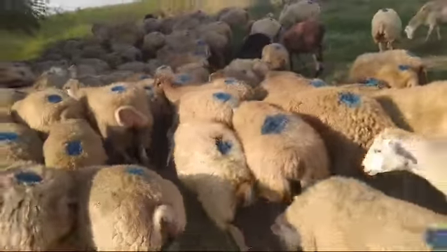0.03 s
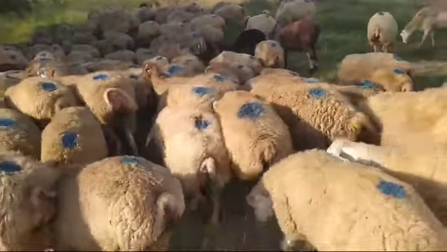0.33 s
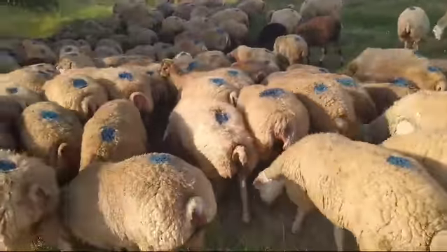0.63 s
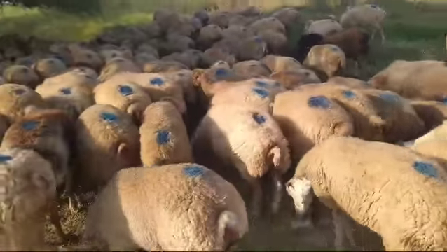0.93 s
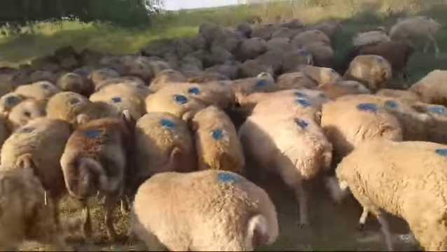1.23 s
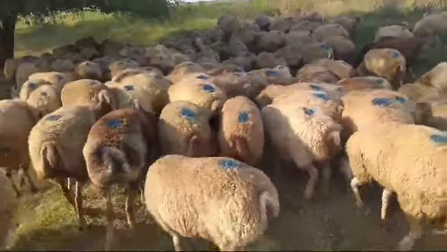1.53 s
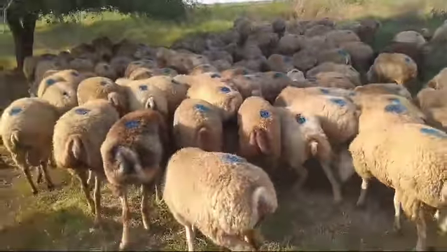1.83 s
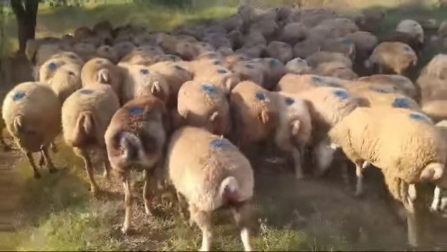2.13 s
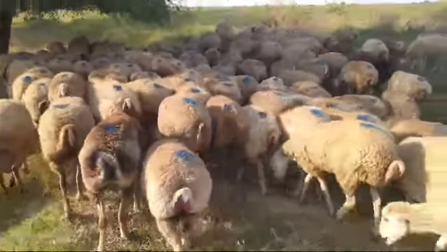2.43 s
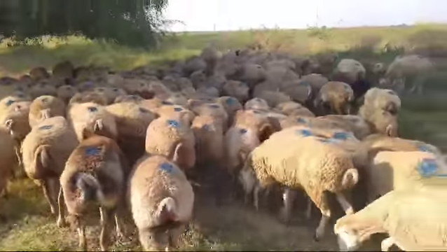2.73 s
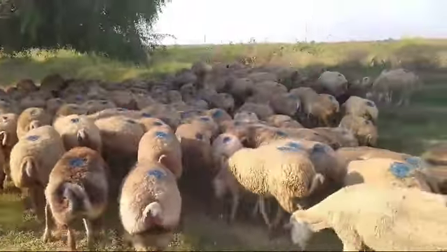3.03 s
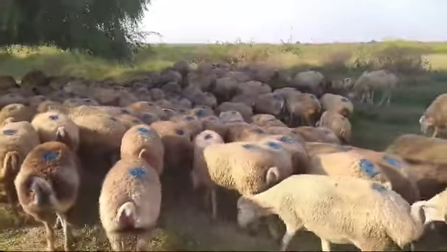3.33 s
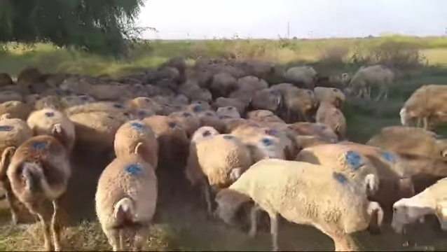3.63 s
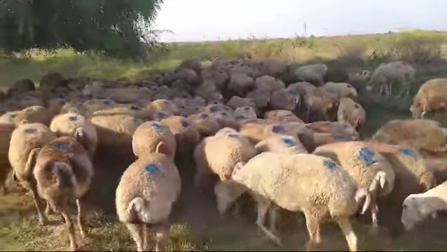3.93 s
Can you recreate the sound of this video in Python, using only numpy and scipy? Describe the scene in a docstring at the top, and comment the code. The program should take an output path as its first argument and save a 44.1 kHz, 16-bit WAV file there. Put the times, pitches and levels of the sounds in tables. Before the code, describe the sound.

Sheep rustle and crackle through grass while handling knocks and soft footsteps hit the microphone.

```python
"""Grass rustles close by as a flock of sheep crosses a field, followed on foot with a hand-held phone.
Legs and muzzles brush and snap the stalks, mostly on the left; hooves patter and the walker's steps
thud softly. Sharp knocks, probably fingers on the case, ring one microphone port at a time.
Near the end a far bird chatters. Behind it all lie the distant flock and a light rumble of wind."""
import sys
import numpy as np
from scipy import signal
from scipy.fft import rfft, irfft
from scipy.io import wavfile
from scipy.ndimage import uniform_filter1d

SR = 44100
rng = np.random.default_rng(int(sys.argv[2]) if len(sys.argv) > 2 else 0)


def waveform_to_disk(signal):
    """Save audio, clipped to [-1, 1], as 16-bit WAV at the path in sys.argv[1]."""
    frames = np.transpose(np.atleast_2d(signal))
    scaled = np.clip(frames, -1, 1) * 32767
    samples = np.round(scaled).astype(np.int16)
    wavfile.write(sys.argv[1], SR, samples)


N = 4 * SR
T = np.arange(N) / SR
HZ = np.maximum(np.fft.rfftfreq(N, 1 / SR), 1e-3)


def undb(db):
    """Decibels to gain."""
    return 10 ** (np.asarray(db) / 20)


def unit(x):
    """Scale to rms 1."""
    return x / np.sqrt(np.mean(x ** 2))


def pan(db):
    """Left and right gains for a level difference; positive is left."""
    return unit(undb(np.array([[db], [-db]]) / 2))


def noise():
    """Independent white noise at the two microphones."""
    return rng.standard_normal((2, N))


def resonance(hz, width_hz):
    """Frequency response of one resonance."""
    return 1 / (1 + 1j * (HZ ** 2 - hz ** 2) / (HZ * width_hz))


def band(x, hz, width_hz):
    """Pass through a resonance twice; rms 1."""
    return unit(irfft(rfft(x) * resonance(hz, width_hz) ** 2, N))


def smooth(x, width_hz):
    """Low-pass to rms 1; multiplied by a tone, this makes a band width_hz wide."""
    return unit(irfft(rfft(x) / (1 + (2 * HZ / width_hz) ** 2), N))


def colour(x, points):
    """Shape the spectrum by (f/Hz, gain/dB) points; rms 1."""
    hz, db = np.array(points).T
    return unit(irfft(rfft(x) * undb(np.interp(np.log(HZ), np.log(hz), db)), N))


def wander(rate_hz):
    """Smooth random drift; rms 1."""
    hold = int(SR / rate_hz)
    stairs = np.repeat(rng.standard_normal(N // hold + 1), hold)
    return unit(uniform_filter1d(uniform_filter1d(stairs, hold), hold)[:N])


def grains(per_s, spread_db):
    """Random stereo impulses, mostly small and a few large."""
    size = undb(spread_db * np.minimum(rng.exponential(size=(2, N)), 5))
    return (rng.random((2, N)) < per_s / SR) * size * np.sign(noise())


def swell(at, rise_s, fall_s):
    """A rounded rise and fall about one moment."""
    return np.exp(-((T - at) / np.where(T < at, rise_s, fall_s)) ** 2)


# Rustle of the grass close by: t/s, left level/dB, right level/dB
RUSTLE_LEVELS = [(0, -41.5, -52), (.27, -45, -51.5), (.42, -43.5, -60), (.52, -45, -53), (.72, -43.5, -52),
                 (.95, -44, -51), (1.15, -42.5, -49), (1.38, -41.5, -44.5), (1.44, -45.5, -51.5),
                 (1.8, -41.5, -45.5), (1.845, -45.5, -47.5), (1.93, -44, -48), (2.32, -43.5, -47),
                 (2.41, -49.5, -51), (2.51, -44.5, -50), (2.68, -46.5, -53), (3.15, -45.5, -52),
                 (3.42, -45, -51), (3.56, -42.5, -50.5), (3.68, -47.5, -50.5), (4, -47.5, -47.5)]
# Its spectrum at the left and at the right microphone: f/Hz, relative level/dB
RUSTLE_LEFT = [(1500, -15.5), (3000, -8), (5000, -10.5), (6500, -6.5), (8200, -1), (11500, -2), (13500, -8),
               (16000, -22)]
RUSTLE_RIGHT = [(1500, -5), (3000, -4.5), (5000, -1), (7500, -1), (11000, -14.5), (16000, -3)]
# Narrow swish within it, a little to the right: t/s, centre f/Hz, level/dB
SWISH_PATH = [(0, 9700, -43.5), (0.449, 9430, -50.5), (0.583, 9210, -48), (0.799, 8950, -49.5),
              (1.253, 8370, -47.5), (1.479, 8380, -47.5), (1.652, 7900, -49.5), (1.78, 7460, -41.5),
              (1.845, 7420, -58), (1.923, 7590, -47.5), (2.151, 7120, -61), (2.27, 8300, -48),
              (2.4, 8240, -107)]

def grass(blades_per_s=2800):
    """Countless blades brush past legs and wool; a narrow swish sinks in pitch and fades."""
    times, left_db, right_db = np.array(RUSTLE_LEVELS).T
    left, right = grains(blades_per_s, spread_db=1.5)
    blades = np.array([colour(left, RUSTLE_LEFT) * undb(np.interp(T, times, left_db)),
                       colour(right, RUSTLE_RIGHT) * undb(np.interp(T, times, right_db))])
    times, hz, db = np.array(SWISH_PATH).T
    phase = 2 * np.pi * np.cumsum(np.interp(T, times, hz)) / SR
    brushing = smooth(grains(blades_per_s, spread_db=1.5), width_hz=3100)
    swish = unit(brushing * np.cos(phase)) * undb(np.interp(T, times, db))
    flicker_db = 1.94 * wander(rate_hz=45.38)
    return (blades + swish * pan(db=-4)) * undb(flicker_db)


# Tufts crushed underfoot, left of centre: t/s, rise and fall/s, level/dB, centre f/Hz, L-R/dB
TRODDEN_TUFTS = [(.41, 0.093, -43.5, 7900, 3), (0.605, 0.059, -46, 5540, 13), (1.13, 0.068, -45, 7100, 3),
                 (1.797, 0.016, -37.5, 6400, 5), (2.26, 0.041, -48, 8070, 13), (3.3, 0.031, -53, 4560, 3),
                 (3.52, 0.21, -53, 3270, 5), (3.877, 0.0059, -41.5, 4640, 1)]

def tufts():
    """A trodden tuft gives way in a short shower of tiny cracks."""
    cracks = grains(per_s=1500, spread_db=1)
    return sum(band(cracks, hz, width_hz=3200) * undb(db) * swell(at, fade_s, fade_s) * pan(pan_db)
               for at, fade_s, db, hz, pan_db in TRODDEN_TUFTS)


def crinkle(rustle, spacing_hz=700, depth_db=1.8):
    """Narrow bands of the rustle flicker, each on its own."""
    spectrum = rfft(rustle)
    bands = (irfft(spectrum * np.maximum(0, 1 - abs(HZ - hz) / spacing_hz), N)
             for hz in range(0, 17000, spacing_hz))
    trim = undb(-depth_db ** 2 * np.log(10) / 20)  # offsets the power that the flicker adds
    return trim * sum(part * undb(depth_db * wander(rate_hz=39.7)) for part in bands)


# Stalks snapping nearby, mostly on the left: t/s, crack level over 10 ms/dB, centre f/Hz, L-R/dB
STALK_SNAPS = [(0.3449, -36.5, 9100, 20), (0.695, -37, 9400, 2), (0.79, -50, 2600, 12),
               (0.839, -44, 9050, 9), (0.8915, -36.5, 9500, 5), (1.011, -44, 7900, 2),
               (1.129, -41, 8630, 2), (1.3355, -23.5, 9900, 7.5), (1.4628, -43, 9900, 10),
               (1.541, -43, 8900, 7), (1.635, -41.5, 8850, 17), (1.789, -36.5, 9700, 20),
               (1.8557, -36, 12100, 20), (1.9864, -45.5, 7300, 6), (2.0098, -47, 7900, -1),
               (2.019, -39.5, 7640, 8), (2.113, -37, 7400, 1.5), (2.2264, -47, 7500, 13),
               (2.262, -44, 8000, 15), (2.292, -47, 9000, 12), (2.342, -42, 10600, 15),
               (3.162, -48, 10700, 17), (3.1755, -45, 9500, 18), (3.2862, -42.5, 8700, 17),
               (3.7719, -46, 12300, 17), (3.876, -39.5, 8350, 11)]
# Woody body of a snap: f/Hz, relative level/dB
STALK_SPECTRUM = [(60, -20), (200, 5), (500, 7), (1100, 3), (2200, 0), (4500, 1), (9000, -14), (16000, -23)]

def snaps(rise_s=.0003, crack_s=.0005, splinter_s=.0028):
    """A stalk breaks with one sharp crack over a woody body and splinters for a few milliseconds."""
    out = np.zeros((2, N))
    body = undb(-16.5) * colour(signal.unit_impulse(N), STALK_SPECTRUM)
    for at, db, hz, pan_db in STALK_SNAPS:
        age = np.clip(T - at, 0, .1)
        attack = np.exp(np.clip(T - at, -.02, 0) / rise_s)
        decay = np.exp(-age / crack_s) + undb(-13) * np.exp(-age / splinter_s)
        burst = band(noise() * attack * decay, hz, width_hz=.46 * hz)
        crack = np.array([unit(side) for side in burst])
        out += (crack + np.roll(body, int(at * SR))) * undb(db) * pan(pan_db)
    return out * np.sqrt(.01 * SR / N)  # levels hold over 10 ms


def hooves():
    """Many small hooves patter on the soil and, to the left, crackle in dry stems."""
    soil, stems = grains(per_s=45, spread_db=3), grains(per_s=100, spread_db=3)
    patter = band(soil + .5 * soil[::-1], hz=386, width_hz=710)  # each hoof reaches both microphones
    crumble = rng.standard_normal((1, SR // 20)) * np.exp(-T[:SR // 20] / .005)
    ticks = signal.fftconvolve(stems + .1 * stems[::-1], crumble)[:, :N]
    crackle = band(ticks, hz=6440, width_hz=10500)
    return undb(-65) * patter + undb(-56) * crackle * pan(db=16.5)


# Knocks right at the microphones: t/s, port (0 left, 1 right),
# levels over 10 ms of deep push/dB, thud/dB, knock/dB and crack/dB, crack f/Hz
PORT_KNOCKS = [(0.688, 1, -44, -38, -39.5, -33.5, 2150), (0.8818, 0, -53, -47, -44, -39, 2780),
               (0.893, 0, -63, -23.5, -22.5, -20.5, 2240), (1.463, 0, -62, -35.5, -33.5, -36, 2550),
               (1.6374, 0, -53, -36, -30.5, -36, 2530), (1.657, 0, -48, -33.5, -74, -54, 2340),
               (1.7889, 0, -61, -37.5, -34, -45.5, 2805), (1.9864, 0, -64, -38.5, -38, -47, 3287),
               (2.0121, 1, -41, -70, -29, -35, 1532), (2.0096, 0, -52, -56, -42, -51, 2400),
               (2.0203, 0, -41, -53, -41.5, -36.5, 2300), (2.499, 1, -44, -71, -45, -48, 1790),
               (2.6156, 1, -49, -32.5, -36, -65, 1630), (2.7413, 1, -38.5, -38.5, -50, -52.5, 2130),
               (2.768, 1, -45, -58, -44, -43, 1700), (2.7917, 1, -30, -19.5, -30.5, -33.5, 2240),
               (2.9533, 1, -55, -43, -45, -52, 2050), (2.9917, 1, -32, -20, -26, -32, 2310),
               (3.0442, 1, -42.5, -70, -43, -42, 3100), (3.0521, 1, -59, -70, -48, -43, 1700),
               (3.107, 1, -46, -63, -42, -34.5, 3370), (3.224, 1, -44, -67, -49.5, -43.5, 2140),
               (3.2588, 1, -49, -44, -46.5, -41, 1760)]
# Push, thud and knock resonances of a port: f/Hz, width/Hz
PORT_RESONANCES = [(65, 600), (235, 327), (560, 716)]
# Bands that the phone's tone filters delay, so each knock ends in a short low ring: f/Hz, width/Hz
PHONE_FILTER_BANDS = [(144, 33), (810, 150)]

def knocks(body_top_hz=3500, edge_db=(-21, -11.5)):
    """Each knock rings one port: the crack and its bright edge lead, the lows follow and ring briefly."""
    filter_delay = np.prod([1 - 2 * resonance(hz, width) for hz, width in PHONE_FILTER_BANDS], axis=0)
    length = SR // 10

    def ring(hz, width_hz, top_hz=None):
        response = resonance(hz, width_hz) ** 2 * filter_delay
        if top_hz:
            response *= signal.freqs(*signal.butter(6, 1, analog=True), HZ / top_hz)[1]
        return unit(irfft(response, N)[:length]) / np.sqrt(10)  # energy of 10 ms at rms 1

    push, thud, knock = (ring(hz, width, body_top_hz) for hz, width in PORT_RESONANCES)
    edge = ring(hz=6250, width_hz=2600)
    out = np.zeros((2, N + length))
    for at, port, push_db, thud_db, knock_db, crack_db, hz in PORT_KNOCKS:
        start = int(at * SR)
        body = undb(thud_db) * thud - undb(push_db) * push - undb(knock_db) * knock
        # a harder, higher crack is also wider and reaches further into the treble
        crack = ring(hz, width_hz=.64 * hz, top_hz=1.48 * hz) - undb(edge_db[port]) * edge
        out[port, start:start + length] += body + undb(crack_db) * crack
    return out[:, :N]


# The walker's steps, below the phone: peak t/s, thud level/dB, scuff level/dB
FOOTFALLS = [(.005, -51.5, -83), (0.567, -41.5, -47.5), (1.065, -47, -59), (1.562, -41, -60),
             (2.04, -64, -58), (2.529, -43, -55), (3.025, -49, -59), (3.454, -46.5, -56.5),
             (3.926, -50, -78)]
# Sole on the ground: f/Hz, relative level/dB
SCUFF_SPECTRUM = [(100, 1), (280, 6), (620, 6), (1200, -2), (2200, -9.5), (6000, -5), (14000, -55)]

def steps(scuff_lag_s=.032):
    """Soft footfalls boom through the hand; the sole scuffs the ground just after."""
    boom = band(rng.standard_normal(N), hz=186.3, width_hz=94)
    boom /= np.sqrt(uniform_filter1d(boom ** 2, SR // 20))  # evens out the level over 50 ms
    friction = colour(noise() + rng.standard_normal(N), SCUFF_SPECTRUM)
    thuds = sum(undb(db) * swell(at, rise_s=.057, fall_s=.056) for at, db, _ in FOOTFALLS)
    scuffs = sum(undb(db) * swell(at + scuff_lag_s, rise_s=.1, fall_s=.1) for at, _, db in FOOTFALLS)
    return boom * thuds + friction * scuffs


# Notes of a bird, far off to the left: peak t/s, level/dB
BIRD_NOTES = [(3.255, -52.5), (3.332, -56.5), (3.411, -54), (3.489, -52.5), (3.575, -50), (3.66, -52.5),
              (3.745, -51), (3.84, -51.5), (3.936, -51.5)]

def bird(centre_hz=2660, rise_hz_per_s=2500, lower_ratio=.79, fade_s=.029):
    """A quick run of hoarse notes, each rising through two throat resonances."""
    peaks = np.array(BIRD_NOTES)[:, 0]
    from_peak = T - peaks[np.argmin(abs(T[:, None] - peaks), axis=1)]
    hz = centre_hz + rise_hz_per_s * np.clip(from_peak, -2 * fade_s, 2 * fade_s)
    phase = 2 * np.pi * np.cumsum(hz) / SR
    upper = smooth(noise(), width_hz=430) * np.cos(phase)
    lower = smooth(noise(), width_hz=1300) * np.cos(lower_ratio * phase)
    notes = sum(undb(db) * swell(at, fade_s, fade_s) for at, db in BIRD_NOTES)
    return unit(upper + undb(-2.5) * lower) * notes * pan(db=6.5)


# The distant flock and the open field, all around: f/Hz, relative level/dB
FIELD_SPECTRUM = [(20, 6.5), (60, 1.5), (120, -5.5), (200, 4), (320, -2), (600, -7.5), (1200, -16),
                  (2600, -15), (4500, -19), (7000, -54), (16000, -23.5)]

def far_flock():
    """The far flock blurs into a soft bed, partly shared by the two microphones."""
    level_db = -53.5 + .6 * wander(rate_hz=7.92)
    return colour(noise() + 1.12 * rng.standard_normal(N), FIELD_SPECTRUM) * undb(level_db)


def wind():
    """Light wind rumbles at each port and puffs once."""
    gusts = undb(-70.5 + 7.5 * wander(rate_hz=6.2))
    puff = undb(-47) * swell(at=1.68, rise_s=.021, fall_s=.021)
    return band(noise(), hz=44.3, width_hz=88.6) * (gusts + puff)


def scene():
    """Everything that reaches the phone's two microphones."""
    sheep = crinkle(grass() + tufts()) + snaps() + hooves()
    return sheep + knocks() + steps() + bird() + far_flock() + wind()


def record(dry):
    """The phone cuts the treble steeply above 15850 Hz."""
    return signal.sosfilt(signal.ellip(10, .2, 70, 15850, fs=SR, output="sos"), dry)


dry = scene()
out = record(dry)
waveform_to_disk(out)
```